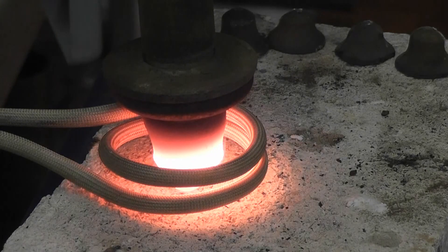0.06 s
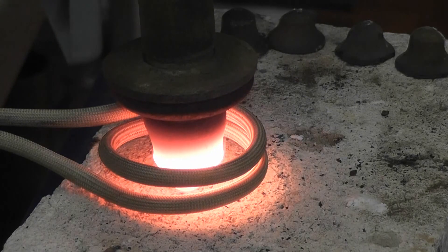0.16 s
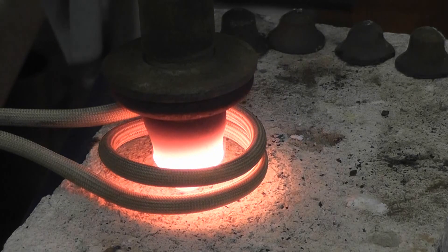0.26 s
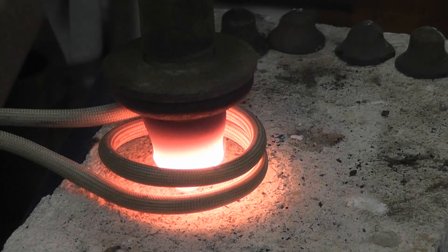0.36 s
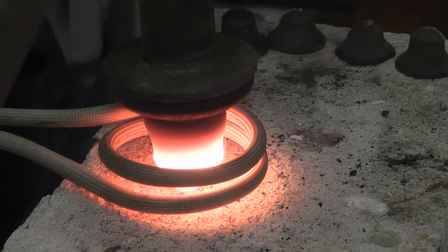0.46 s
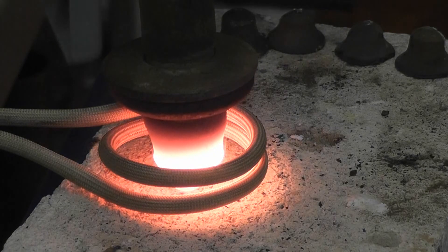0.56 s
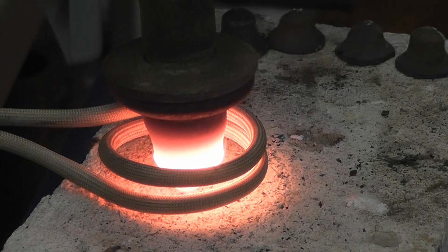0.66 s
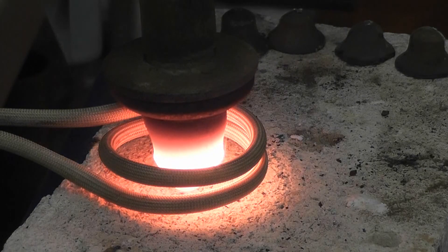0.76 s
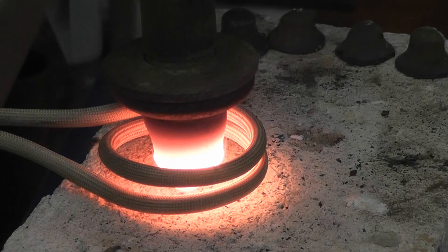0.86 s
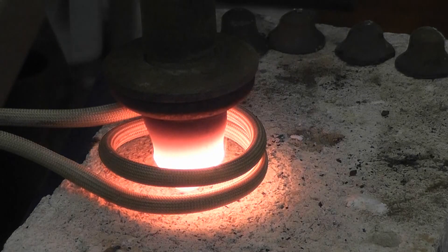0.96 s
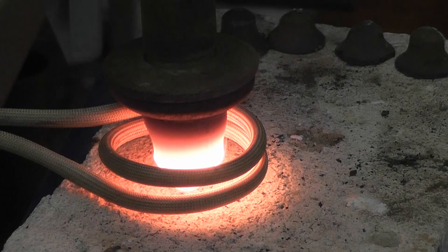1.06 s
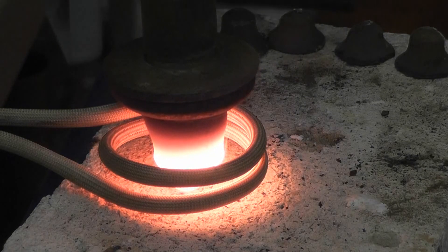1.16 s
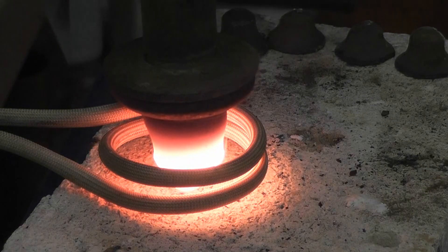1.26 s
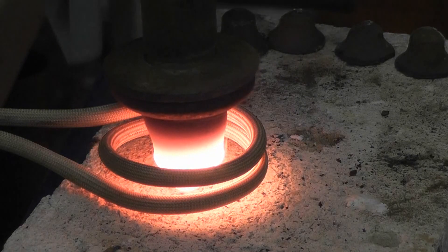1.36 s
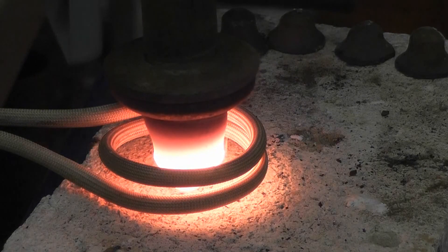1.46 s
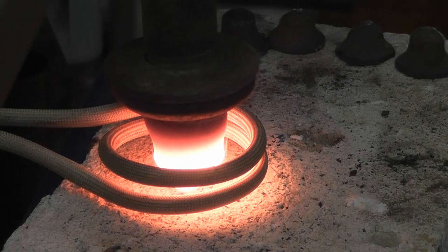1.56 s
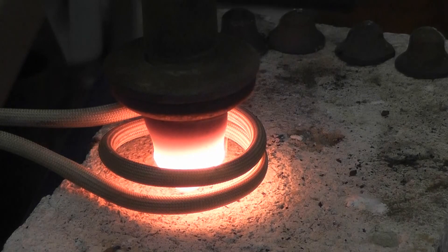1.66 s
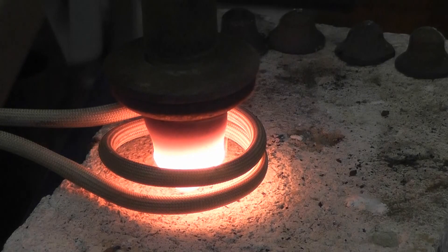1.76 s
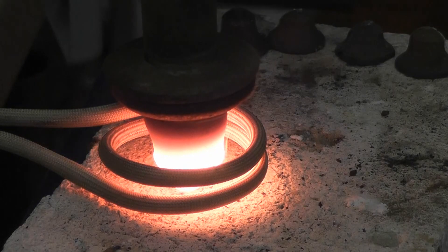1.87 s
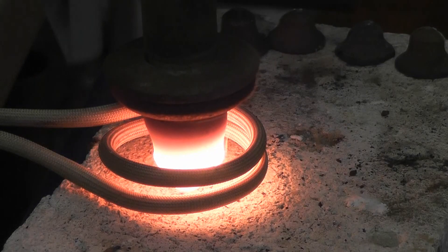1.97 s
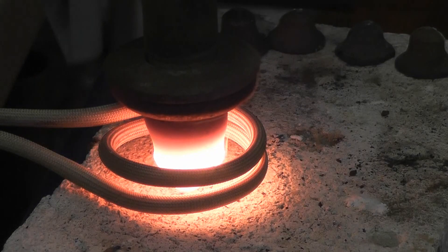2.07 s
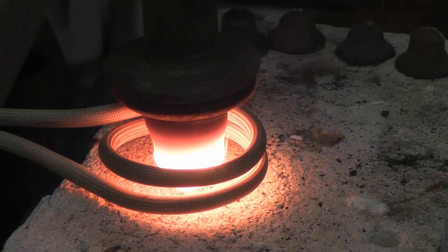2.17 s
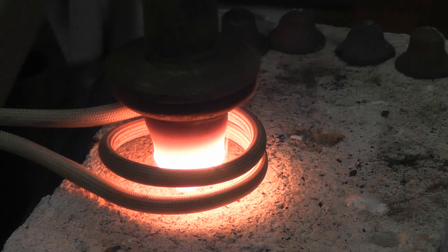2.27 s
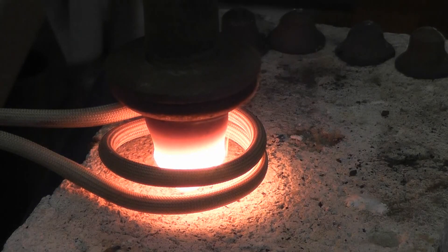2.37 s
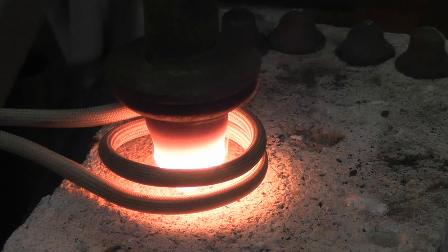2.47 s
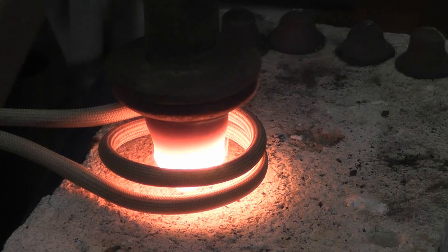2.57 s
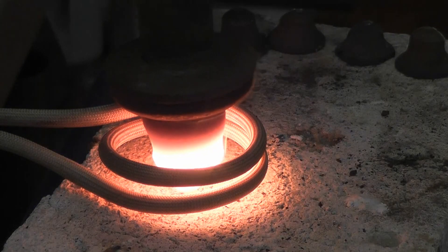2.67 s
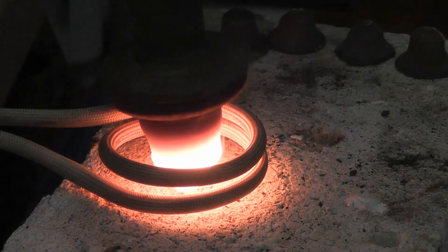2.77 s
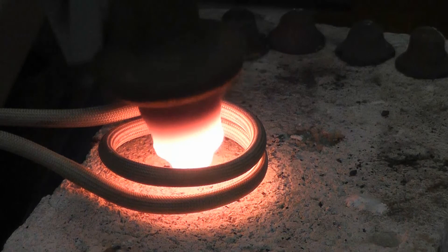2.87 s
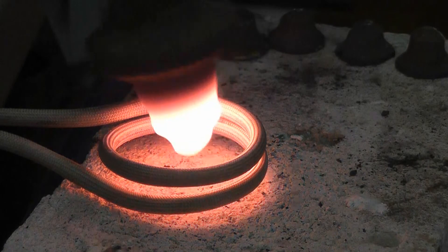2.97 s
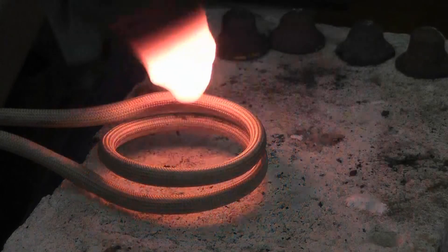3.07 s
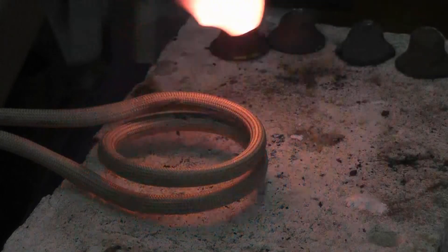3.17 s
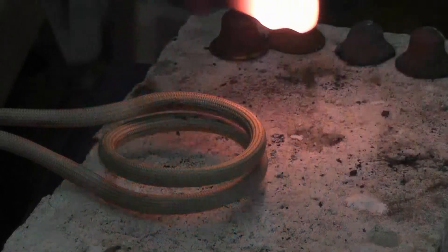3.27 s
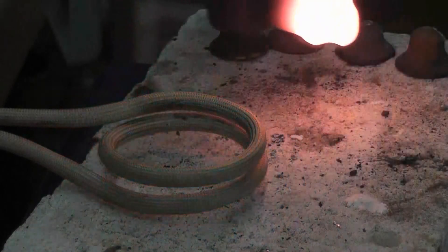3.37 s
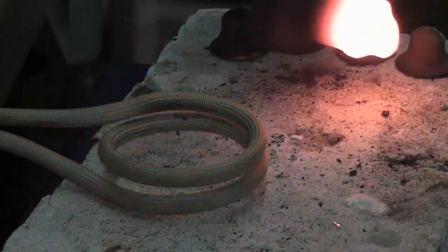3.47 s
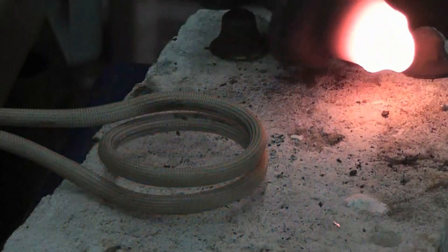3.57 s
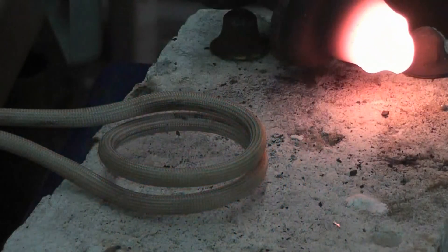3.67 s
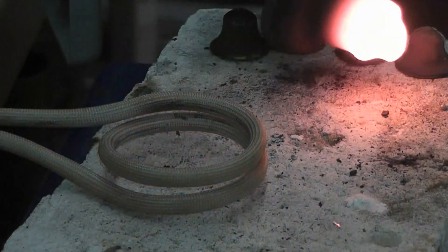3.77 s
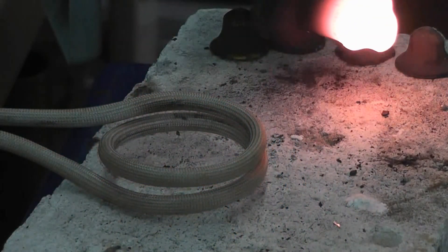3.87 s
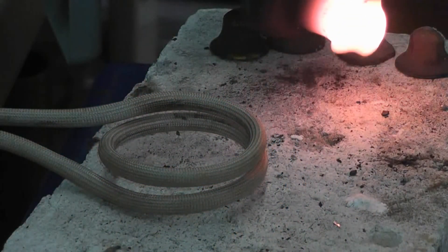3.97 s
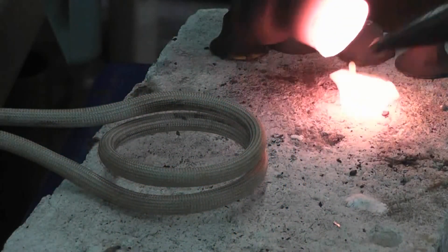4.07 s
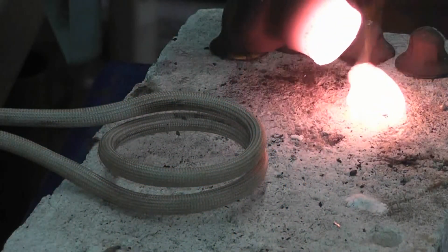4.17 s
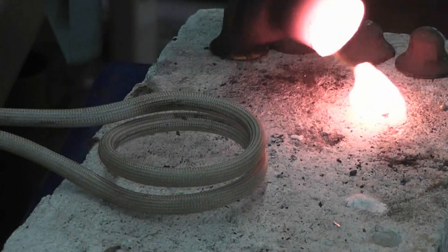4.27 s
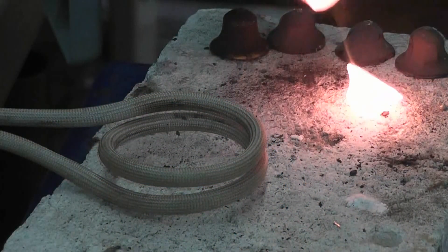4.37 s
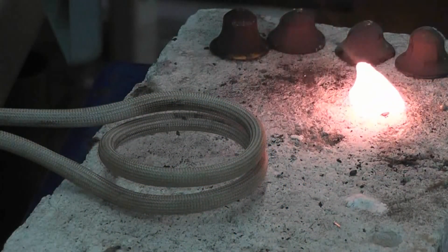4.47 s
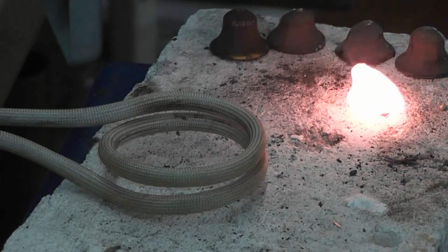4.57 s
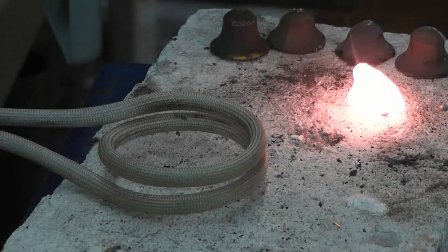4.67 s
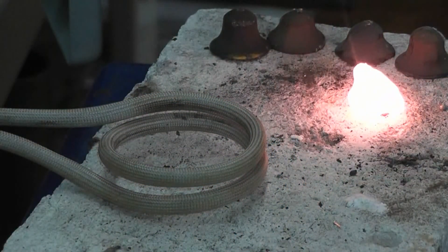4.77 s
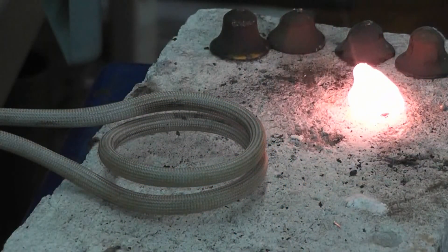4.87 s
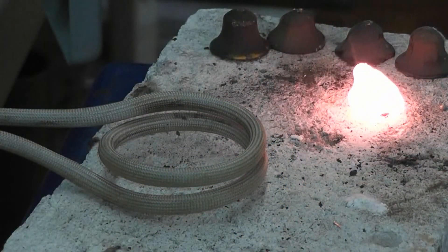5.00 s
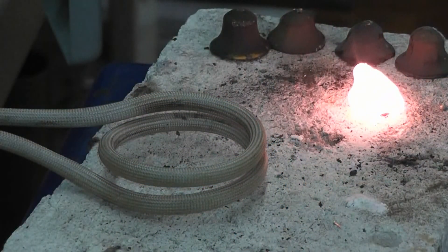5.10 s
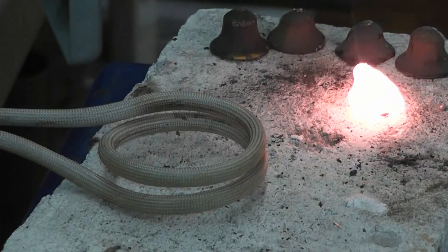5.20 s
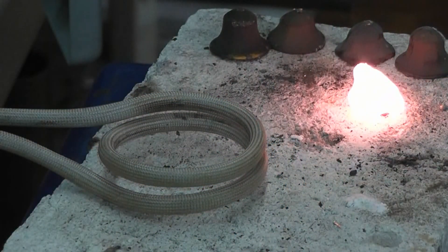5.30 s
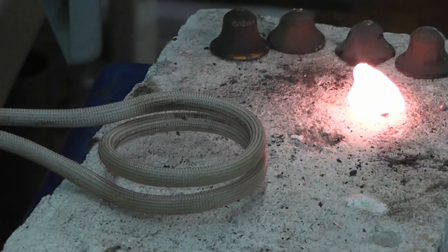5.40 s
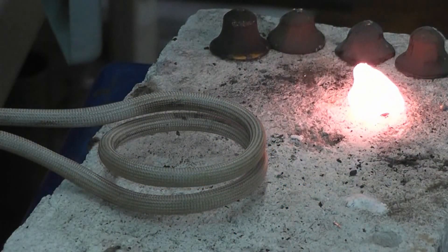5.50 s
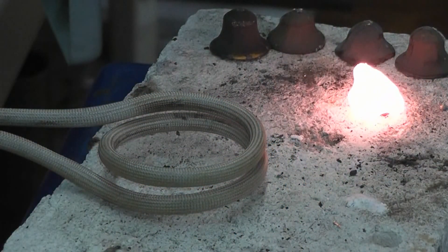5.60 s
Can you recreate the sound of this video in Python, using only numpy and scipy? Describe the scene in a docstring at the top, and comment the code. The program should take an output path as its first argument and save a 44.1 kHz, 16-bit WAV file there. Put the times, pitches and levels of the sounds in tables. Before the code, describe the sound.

Steady low electrical hum and fan whine with rushing air in a workshop, then faint scale ticks, one sharp crack and soft knocks.

```python
"""An induction heater melts the end of a steel part in a workshop, heard in stereo with the heater a little to the left.
Its transformer hums at twice the mains rate, a cooling fan whines and blows through the cabinet, a coolant pump runs:
sines for what turns or hums, shaped noise for the air. The fan speeds up when the part is lifted out of the coil.
Scale ticks on the hot steel in showers of grains; the molten tip meets the firebrick with a sharp crack
and drops with soft knocks, made of ringing modes and short noise."""
import sys
import numpy as np
from scipy import signal
from scipy.fft import rfft, irfft
from scipy.io import wavfile
from scipy.ndimage import uniform_filter1d, minimum_filter1d

SR = 44100
rng = np.random.default_rng(int(sys.argv[2]) if len(sys.argv) > 2 else 0)


def dump_mix(stems):
    """Bounce the given channels to the path in sys.argv[1] as a 16-bit WAV at rate SR."""
    frames = np.atleast_2d(stems).T  # one column per channel
    limited = np.clip(frames, -1, 1)  # hard clip at full scale
    pcm = np.round(limited * 32767).astype(np.int16)
    wavfile.write(sys.argv[1], SR, pcm)


N = 248724
TIME = np.arange(N) / SR
FREQ = np.maximum(np.arange(N // 2 + 1) * SR / N, 1)

# The cabinet as it reaches the two microphones.
# Each row: frequency in Hz, left minus right in dB, phase lead of the left in rad, diffuse share in dB.
PORTS = [(60, -4, 0, -25), (126, -0.1, 0.13, -24.5), (200, -3, 0.33, -12), (346, 3, 0.9, -17),
         (624, 1, 0, -6), (1230, 4, 0.022, -4.5), (2400, 4, 0, -8), (4380, 1.7, 0.5, -22.5),
         (7900, 0, 0, -15), (13900, 2, 0, 0)]


def undb(db):
    """Decibels to gain."""
    return 10 ** (np.asarray(db) / 20)


def across(table):
    """Each column of a (Hz, ..) table on the frequency axis, interpolated over log frequency."""
    hz, *columns = np.transpose(table)
    return [np.interp(np.log(FREQ), np.log(hz), column) for column in columns]


def noise(db):
    """Noise with the given density in dB per Hz."""
    return irfft(rfft(rng.standard_normal(N)) * undb(db), N) * np.sqrt(SR / 2)


def unit(x):
    """Scale to rms 1."""
    return x / np.std(x)


def walk(rate):
    """Slow chance with spread 1, changing about rate times a second."""
    return unit(irfft(rfft(rng.standard_normal(N)) / (1 + (FREQ / rate) ** 4), N))


def swell(centre_s, width_s):
    """A smooth rise to 1 and back."""
    return np.exp(-((TIME - centre_s) / width_s) ** 2)


def fade(t60):
    """Exponential decay from time zero, 60 dB down after t60 seconds."""
    return np.exp(-np.log(1000) * TIME / t60)


def tone(turns, db):
    """A sine of the given rms level that follows a count of turns."""
    return np.sqrt(2) * undb(db) * np.sin(2 * np.pi * (turns + rng.random()))


def ring(modes):
    """Response of (Hz, dB, t60) modes to one blow, with alternating signs."""
    out = np.zeros(N)
    for k, (hz, db, t60) in enumerate(modes):
        out += (-1) ** k * undb(db) * fade(t60) * np.sin(2 * np.pi * hz * TIME)
    return out


def gritty(db, grain_db):
    """Uneven grains with the given colour and spread of sizes; rms 1."""
    grains = rng.standard_normal(N) * undb(grain_db * rng.standard_normal(N))
    return unit(irfft(rfft(grains) * undb(db), N))


def strike(events, response):
    """Play a two-channel response at every (s, dB) event."""
    out = np.zeros((2, N))
    for s, db in events:
        start = int(s * SR)
        out[:, start:] += undb(db) * response[:, :N - start]
    return out


def scrapes(grain_db=6, attack_s=.001):
    """Hot scale scrapes and flakes off: showers of tiny uneven grains that build quickly and thin out."""
    # Each row: start in seconds, level in dB, t60 in seconds.
    scrape_events = [(2.650, -30, .05), (2.685, -32, .09), (2.728, -34.5, .09), (3.669, -28.5, .045)]
    # Colour of crumbling scale. Each row: frequency in Hz, level in dB.
    scale_colour = [(200, 3), (800, 12), (2000, 8), (4000, 4), (6000, 1), (8000, -4.5), (11500, -12),
                    (15000, -30)]
    rise = 1 - np.exp(-TIME / attack_s)
    colour = across(scale_colour)[0]
    out = np.zeros((2, N))
    for s, db, t60 in scrape_events:
        shower = rise * fade(t60) * gritty(colour, grain_db)
        out += strike([(s, db)], np.tile(shower, (2, 1)))
    return out


def knocks(body_db=-7.0, crush_db=-1.5, crush_t60=0.024, thud_db=-3.5, thud_t60=0.048, thud_hz=700,
           room_db=-14.5, room_t60=0.6, room_hz=600, pan_db=1.5):
    """The soft lump thuds on the brick, rings it and crushes its gritty surface; the room keeps the lows."""
    # The steel bumps the brick. Each row: start in seconds, level in dB, contact time in seconds.
    bumps = [(2.735, -28, .0016), (3.669, -34, .0002), (4.1124, -21.5, .00008), (4.1178, -20.8, .00024),
             (4.1230, -20.5, .001)]
    # Modes of the brick. Each row: frequency in Hz, level in dB, t60 in seconds.
    brick_modes = [(240, -8, .035), (303, -10, .08), (455, -10, .16), (567, -3.5, .08), (645, -11, .08),
                   (1035, -8, .07), (1140, -11, .07), (1394, -13, .14), (1835, -2, .058), (1978, -2, .052),
                   (2557, -12, .14), (3915, -6, .19), (4340, -3, .055)]
    # Colour of the brick's crushed surface. Each row: frequency in Hz, level in dB.
    grit_colour = [(200, 0), (600, 1), (900, -3), (1600, 0), (2500, -2), (4300, -1.5), (7500, 0),
                   (11000, -10), (14000, -22), (16000, -32)]
    grit = gritty(across(grit_colour)[0], grain_db=8) * fade(crush_t60)
    room_colour = -10 * np.log10(1 + (FREQ / room_hz) ** 6 + (300 / FREQ) ** 6)
    room = unit(noise(room_colour)) * fade(room_t60)
    thud_colour = -10 * np.log10(1 + (FREQ / thud_hz) ** 6 + (230 / FREQ) ** 6)
    thud = unit(noise(thud_colour)) * fade(thud_t60)
    blow = undb(body_db) * ring(brick_modes) + undb(crush_db) * grit
    blow = blow + undb(thud_db) * thud + undb(room_db) * room
    left_right = undb([pan_db / 2, -pan_db / 2])
    out = np.zeros((2, N))
    for s, db, contact_s in bumps:
        # a longer contact makes a duller blow
        push = np.sin(np.pi * TIME[TIME < contact_s] / contact_s)
        softened = signal.lfilter(push / push.sum(), 1, blow)
        out += strike([(s, db)], np.outer(left_right, softened))
    return out


def cracks(snap_s=0.00018, burst_db=-21, burst_t60=0.0062, burst_hz=5000, bounce_s=.0052, bounce_db=-17.5,
           near_db=-22, near_t60=0.057, room_db=-29.5, room_t60=0.34, room_hz=9500,
           right_db=3.0, spread=0.36, grain_db=5, patchy_db=2):
    """A brittle, ringing burst on the right, its bounce off the bench, scattered reflections and a room tail."""
    # The molten tip cracks against the firebrick. Each row: start in seconds, level in dB.
    crack_events = [(4.0717, 2)]
    # What a crack rings with. Each row: frequency in Hz, level in dB, t60 in seconds.
    crack_modes = [(230, -39, .03), (1390, -34, .012), (3150, -27, .008), (3710, -16, .013),
                   (4300, -17, .007), (4800, -15.5, .006), (5300, -12.5, .007), (5750, -12, .007),
                   (6380, -10.5, .008), (7200, -5, .0075), (7750, -5.5, .007), (8450, -4.5, .0055),
                   (11550, -4.5, .003), (14100, -11, .003)]
    # Colour of the room's answer. Each row: frequency in Hz, level in dB.
    echo_colour = [(500, -10), (2500, -10), (3800, -2.5), (5200, -7), (6600, -2.5), (7500, 4.5), (8300, -2),
                   (9300, -9.5), (12000, -15), (16000, -27)]
    rise = 1 - np.exp(-TIME / snap_s)
    burst_noise = unit(noise(-10 * np.log10(1 + (FREQ / burst_hz) ** 4)))
    burst = undb(burst_db) * fade(burst_t60) * burst_noise
    highpass = signal.butter(2, 220, "high", fs=SR, output="sos")
    snap = signal.sosfilt(highpass, (ring(crack_modes) + burst) * rise)
    snap = snap + undb(bounce_db) * np.interp(TIME - bounce_s, TIME, snap, left=0)

    colour = across(echo_colour)[0]
    near = undb(near_db) * fade(near_t60) * unit(noise(colour))
    # the room tail is duller than the near reflections and partly differs between the channels
    damped = colour - 10 * np.log10(1 + (FREQ / room_hz) ** 8)
    shared = gritty(damped, grain_db) * undb(patchy_db * walk(120))
    response = []
    for side in (-1, 1):  # left, right
        tail = unit(shared + spread * unit(noise(damped)))
        room = undb(room_db) * fade(room_t60) * tail
        response.append((snap + (near + room) * rise) * undb(side * right_db / 2))
    return strike(crack_events, np.array(response))


def load(lift_s=2.68, lift_length_s=.68, peak_s=1.95, peak_width_s=.55, peak_share=.32):
    """Power drawn by the coil: about 1 with the part inside, more around a peak, 0 once it is lifted out."""
    lifted = np.clip((TIME - lift_s) / lift_length_s, 0, 1)
    # the heater draws most just before the tip melts
    peak = 1 + peak_share * swell(peak_s, peak_width_s)
    return np.cos(np.pi / 2 * lifted) ** 2 * peak


def pump(shaft_hz=58.67, slip_spread=0.000594):
    """The coolant pump's induction motor slips just behind the mains; its sixth order beats with the fan."""
    # Each row: multiple of the shaft rate, level in dB about which it sways.
    shaft_orders = [(1, -58.5), (3, -56.5), (6, -44.8), (7, -54), (8, -52.5), (11, -49.3), (22, -57.5),
                    (66, -64), (68, -60.5), (70, -59.5)]
    turns = np.cumsum(shaft_hz * (1 + slip_spread * walk(1.76))) / SR
    return sum(tone(round(k) * turns, db + 2 * walk(4.7)) for k, db in shaft_orders)


def ripple(depth=.17, t60=.06, above_hz=3500):
    """Reflections from nearby surfaces leave fine steady peaks and dips in the treble (dB)."""
    echoes = unit(rfft(rng.standard_normal(N) * fade(t60)))
    return 20 * np.log10(np.abs(1 + depth * echoes / (1 + (above_hz / FREQ) ** 4)))


def air(flicker_db=0.15):
    """Air rushes through the resonant cabinet; returns a direct part and a diffuse part for the stereo spread."""
    # Rush of the cooling air. Each row: frequency in Hz, density in dB per Hz before the cabinet colours it.
    rush_colour = [(25, -87), (80, -80), (150, -68.5), (260, -67.5), (480, -64.5), (760, -68.5),
                   (1550, -77.5), (2650, -77.5), (3500, -74.5), (6100, -84), (7800, -86), (9300, -92.5),
                   (11800, -100), (15500, -118)]
    # Resonances and dips of the cabinet and its grille. Each row: frequency in Hz, width in Hz, lift in dB.
    resonances = [(335, 25, 4), (400, 25, -3), (446, 53, 1), (515, 40, 1.5), (682, 22, -5), (745, 50, 4),
                  (950, 120, -1.5), (1103, 34, 8), (1326, 125, 2.5), (2163, 80, 2.5), (2320, 60, -3),
                  (2560, 40, 3), (2640, 110, -3.5), (3100, 260, 2), (3738, 60, 2), (3880, 60, 3),
                  (4260, 100, -2.5), (4370, 70, 4.5), (5180, 130, 3), (5320, 90, -3), (7830, 110, 2)]
    density = across(rush_colour)[0] + ripple()
    for hz, width, db in resonances:
        density = density + db / (1 + (2 * (FREQ - hz) / width) ** 2)
    diffuse_db = across(PORTS)[2]
    direct = noise(density) * undb(flicker_db * walk(23))
    return direct, noise(density + diffuse_db)


def whine(swell_db=2.5, swell_rate=5, wander_rate=25):
    """A thin, unsteady whistle in the air stream that wanders in pitch and comes and goes."""
    # One row: centre frequency in Hz, width of the wander in Hz, level in dB about which it swells.
    whistle = (3742, 42, -55)
    hz, width, db = whistle
    turns = np.cumsum(hz + width / 2 * walk(wander_rate)) / SR
    return tone(turns, db + swell_db * walk(swell_rate))


def fan(free_hz=366.8, sag_hz=5.2, blade_free_db=-35.8, blade_load_db=6.1,
        flutter_turns=0.018, flutter_db=3, waver_db=0.5, waver_rate=5):
    """Under load the fan slows and its clean blade tone is louder; turbulence makes its overtones flutter."""
    # Each row: multiple of the blade rate, level in dB with the coil empty, change under load in dB.
    fan_overtones = [(2, -54.5, -3), (3, -54.5, 1.5), (4, -62, 1), (5, -62, 3.5), (6, -61, -3),
                     (7, -57.5, -7), (8, -63, -6), (9, -63, -6), (10, -63, -6)]
    # The blade tone swells, sags and dips briefly. Each row: centre in seconds, width in seconds, change in dB.
    blade_swells = [(.84, .07, -2.5), (1.2, 1.05, 1.9), (1.32, .16, 1.3), (2.38, .025, -4),
                    (2.65, .25, -.7), (2.745, .014, -7), (2.95, .1, .9), (3.26, .12, -4.5)]
    drawn = load()
    turns = np.cumsum(free_hz - sag_hz * drawn) / SR
    loaded = np.minimum(drawn, 1)
    blade_db = blade_free_db + blade_load_db * loaded + waver_db * walk(waver_rate)
    for s, width, db in blade_swells:
        blade_db = blade_db + db * swell(s, width)
    out = tone(turns, blade_db)
    for k, db, load_db in fan_overtones:
        fluttering = turns + flutter_turns * walk(5.5)
        out = out + tone(round(k) * fluttering, db + load_db * loaded + flutter_db * walk(13))
    return out


def transformer(mains_hz=60.015):
    """The core flexes twice per mains cycle; the weak overtones sway more than the fundamental."""
    # Each row: multiple of the mains rate, level in dB about which it sways.
    hum_orders = [(2, -26.1), (4, -60), (8, -57), (14, -56.5), (28, -65), (30, -66), (32, -68), (42, -65)]
    sway_db = [.15] + [2] * len(hum_orders)
    out = np.zeros(N)
    for (k, db), sway in zip(hum_orders, sway_db):
        out += tone(round(k) * mains_hz * TIME, db + sway * walk(5.9))
    return out


def machine(air_load_db=-0.37):
    """Everything in the cabinet, placed a little to the left by level and phase between the microphones."""
    rush, diffuse = air()
    # the slower fan moves a little less air
    direct = transformer() + pump() + fan() + whine() + rush * undb(air_load_db * load())
    balance_db, lead, _ = across(PORTS)
    side = np.array([[1], [-1]])  # left, right
    placing = undb(side * balance_db / 2) * np.exp(.5j * side * lead)
    return irfft(rfft(direct + side * diffuse) * placing, N)


def scene():
    """The small sounds of the hot steel and the running machine."""
    return scrapes() + knocks() + cracks() + machine()


def record(dry, threshold=1.04, hold_s=0.025, release_s=0.034, round_level=.76, top_hz=15700):
    """A limiter ducks just ahead of a peak, holds and lets go; what slips through saturates; the top is cut."""
    need = np.minimum(1, threshold / (np.abs(dry).max(axis=0) + 1e-9))
    half = int(hold_s * SR / 2)
    cut = 1 - minimum_filter1d(need, 2 * half + 1, origin=half)
    pole = np.exp(-1 / (release_s * SR))
    gain = 1 - np.maximum(cut, signal.lfilter([1 - pole], [1, -pole], cut))
    # widening and smoothing the dip makes it begin ahead of the peak
    limited = dry * uniform_filter1d(minimum_filter1d(gain, size=129), size=129)
    rounded = limited / (1 + (limited / round_level) ** 4) ** .25
    lowpass = signal.ellip(8, .05, 60, top_hz, fs=SR, output="sos")
    return signal.sosfiltfilt(lowpass, rounded)


dry = scene()
out = record(dry)
dump_mix(out)
```